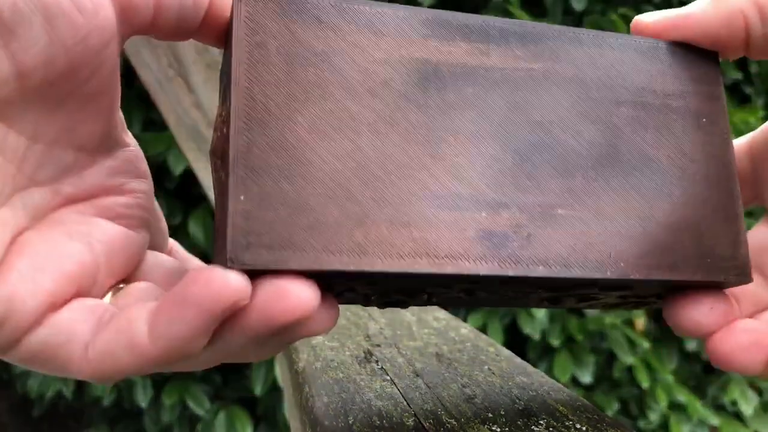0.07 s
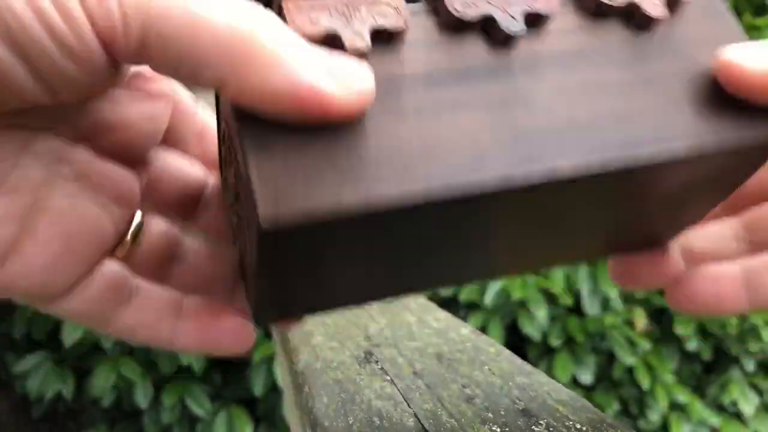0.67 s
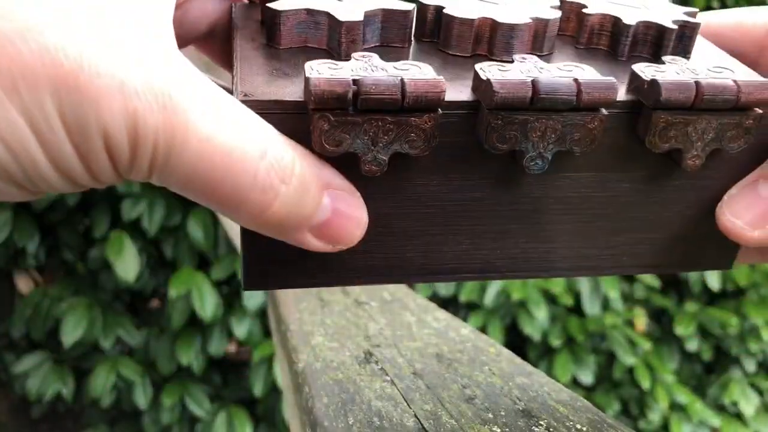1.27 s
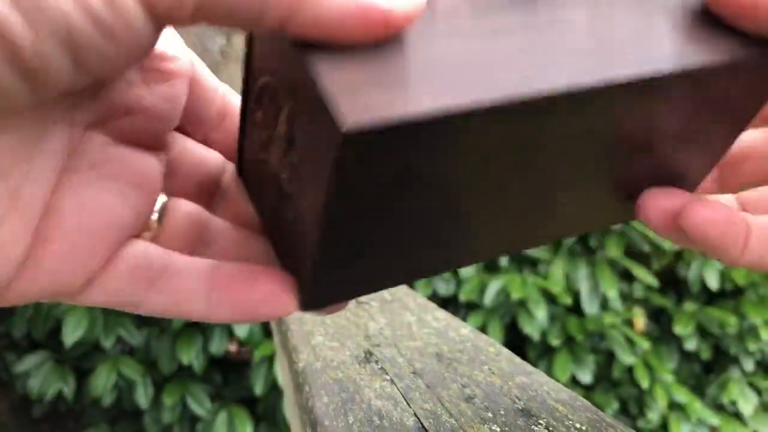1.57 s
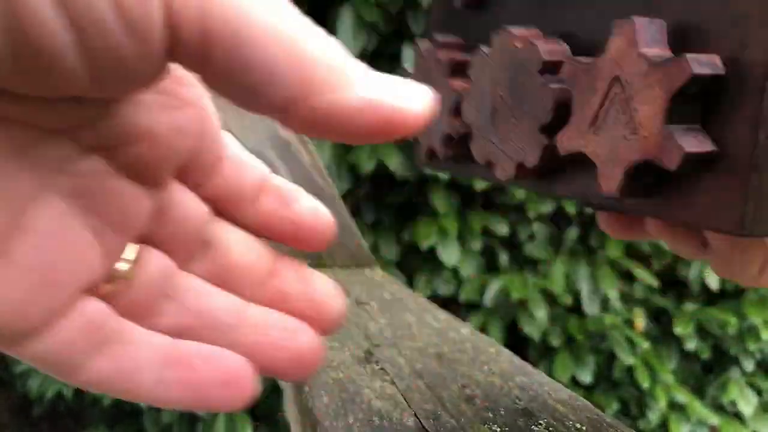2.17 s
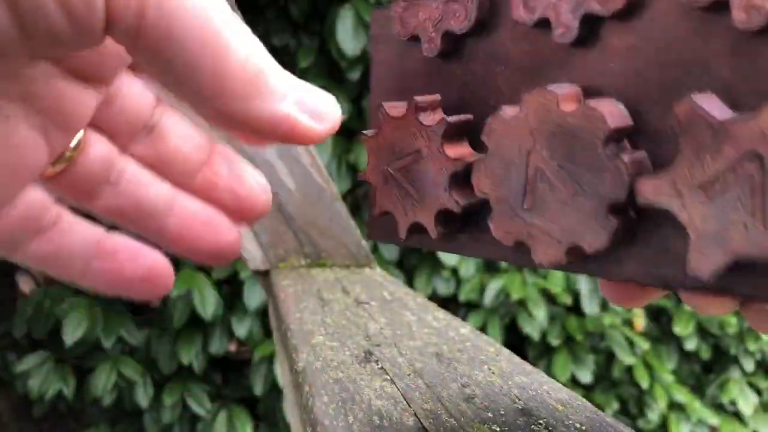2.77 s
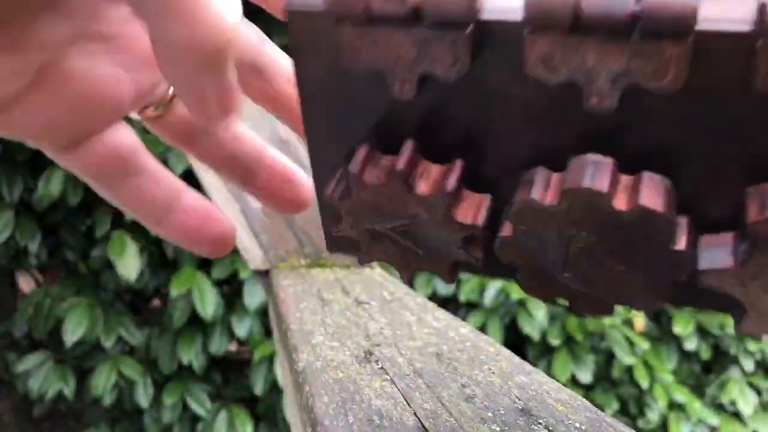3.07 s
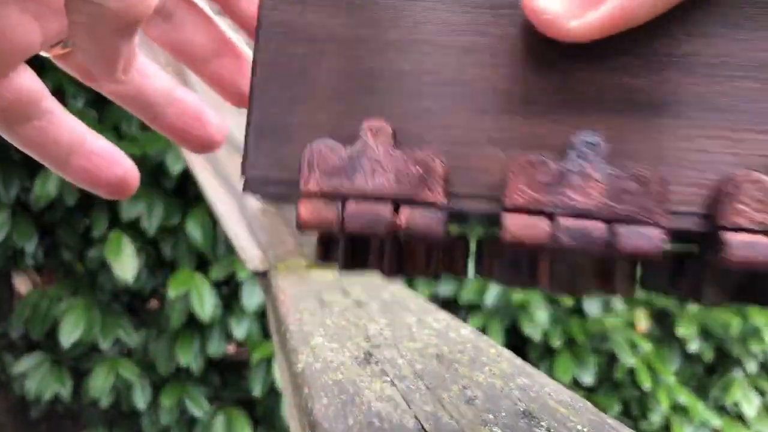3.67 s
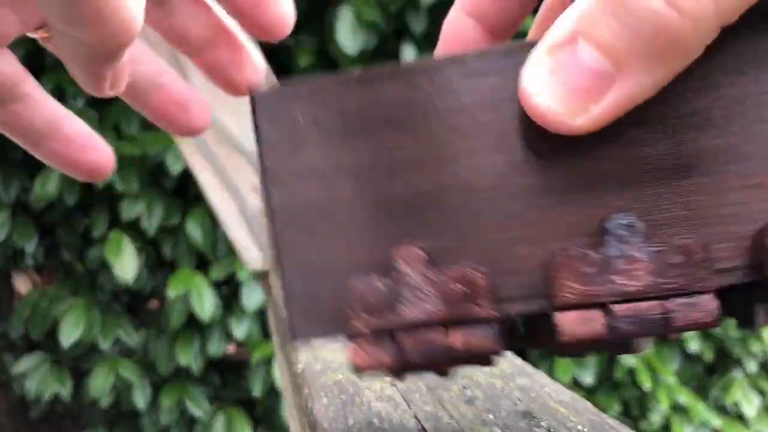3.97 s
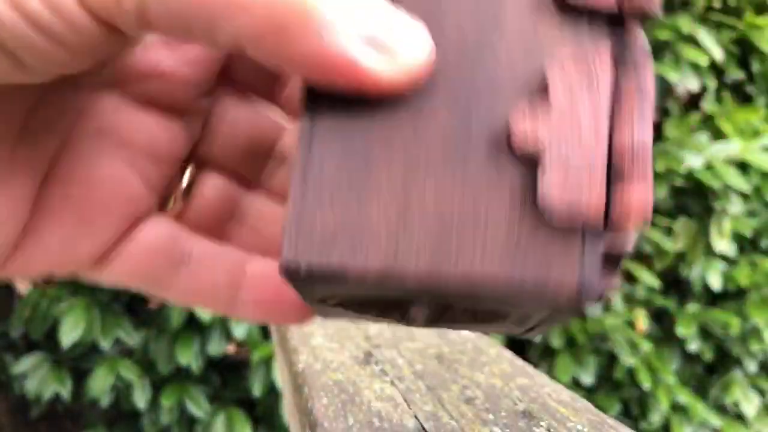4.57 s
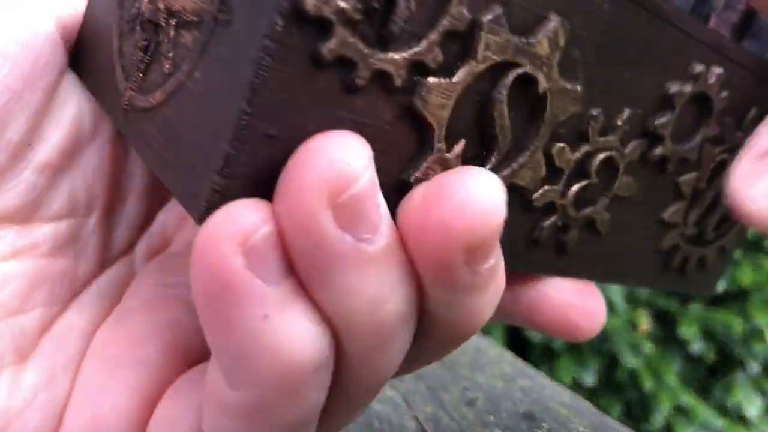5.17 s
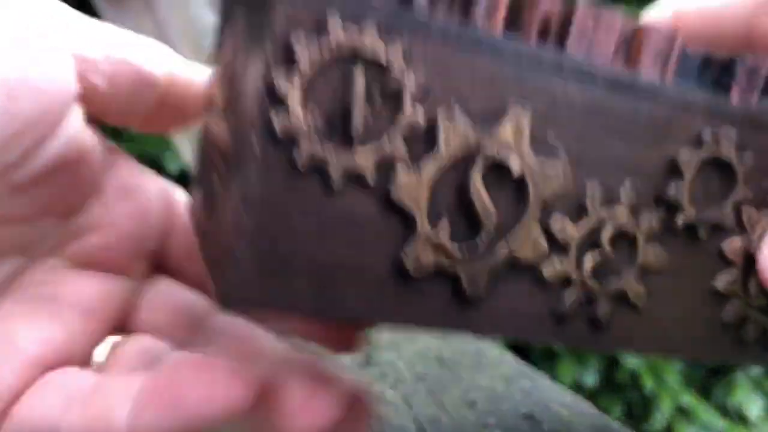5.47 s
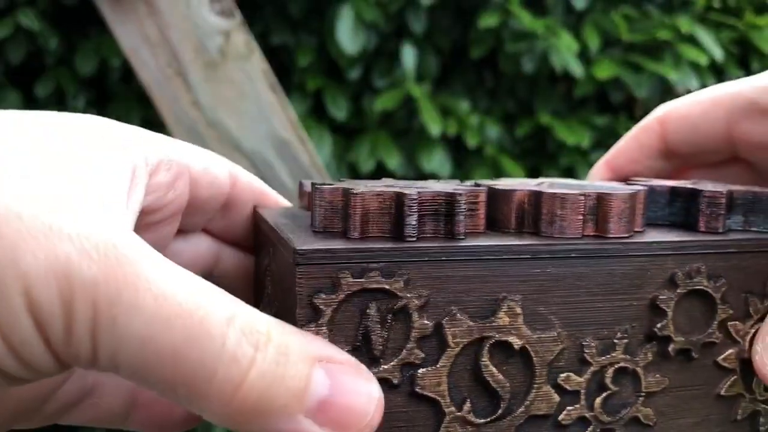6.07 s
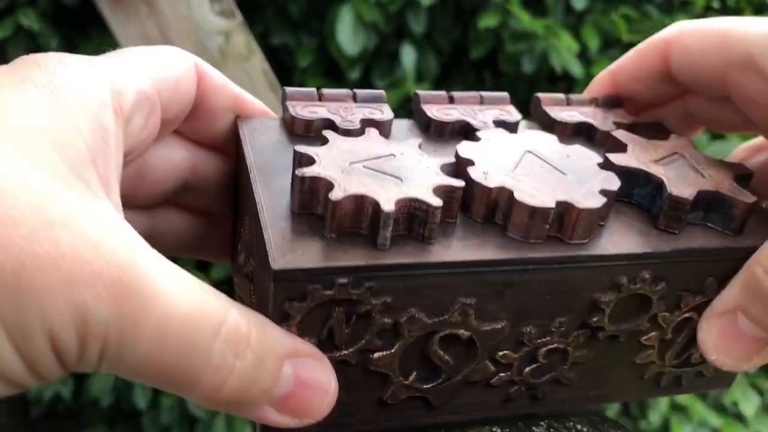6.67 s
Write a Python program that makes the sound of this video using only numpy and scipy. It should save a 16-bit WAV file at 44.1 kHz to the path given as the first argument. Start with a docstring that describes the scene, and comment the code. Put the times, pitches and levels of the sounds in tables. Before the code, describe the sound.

Close up, hands tilt a hard plastic box back and forth, setting off gritty scrapes, hollow knocks and small sharp clicks from its loose parts and latches. The clatter comes in uneven clusters with short lulls, and the sharpest knock falls about halfway through. Near the end the handling softens, a bird chips once very faintly, and a few light knocks follow. The garden around it is still, with only a distant rumble.

```python
"""Puzzle box in a garden

A hollow plastic puzzle box is turned over in the hands, close up, in a quiet garden. Loose parts
slide along its walls and knock against them, and gears and latches tick on the lid; all of them ring
the same modes of the case. Skin brushes it, a bird chips once, and a low rumble comes from far away."""
import sys
import numpy as np
from scipy import signal
from scipy.fft import rfft, irfft
from scipy.io import wavfile
from scipy.ndimage import uniform_filter1d, minimum_filter1d

SR = 44100
rng = np.random.default_rng(int(sys.argv[2]) if len(sys.argv) > 2 else 0)


def output_pcm(signal):
    """Save a mono or channel-first signal as 16-bit PCM at the path in sys.argv[1].

    Samples are clipped to [-1, 1] before scaling.
    """
    pcm = np.clip(np.atleast_2d(signal).T, -1, 1) * 32767
    wavfile.write(sys.argv[1], SR, np.round(pcm).astype(np.int16))


N = 304290
RING_TIME = np.arange(2600) / SR  # time axis of one ring of the box

# the box's registers (deep, hollow, wall, edge, fine), each with a crowd of weak modes:
# low f/Hz, high f/Hz, crowd decay/s, crowd level/dB
REGISTERS = [(246, 800, 0.0029, -3), (441.8, 1110, 0.0078, -9), (970, 2910, 0.0065, -7.5),
             (2800, 6700, 0.0022, -1.5), (7340, 12300, 0.0017, -1.5)]
# each tilt sets parts sliding; they gather speed, run and come to rest:
# t/s, rise/s, run/s, fade/s, level/dB, hollowness/dB, brightness/dB
SLIDES = [(0, 0.018, 0.072, 0.046, -37.5, -0.5, -15.5), (0.089, 0.018, 0.089, 0.083, -55.5, -4, -23),
          (0.279, 0.019, .12, 0.029, -58, 6, -29), (.62, 0.028, 0.11, .05, -60, 3, -28.5),
          (.7, 0.063, 0.11, 0.046, -45.5, 0.5, -25.5), (.88, 0.028, 0.25, 0.13, -44.5, 0.5, -25),
          (1.581, 0.088, 0.11, 0.38, -47.5, 3, -19), (2.179, 0.051, 0.37, 0.056, -40, -1.5, -16.5),
          (2.6, 0.035, .25, 0.051, -46, 2, -25.5), (2.899, 0.023, 0.16, 0.052, -46, 3, -16.5),
          (3.26, 0.098, .36, 0.057, -49.5, 7.5, -15), (3.69, 0.042, 0.15, .06, -43, 1.5, -16.5),
          (3.869, .03, .15, 0.042, -57, 7, -16.5), (4.021, 0.038, .2, .04, -48.5, 4.5, -27),
          (4.27, 0.061, .22, .06, -65, 9.5, -20), (4.66, .16, .045, 0.086, -37, 1.5, -21),
          (4.88, .025, .07, 0.076, -38, -1, -18), (5.84, 0.17, 0.012, 0.14, -46.5, -2, -38)]
# the deep ring against the hollow one, lower where the hands hold tightly: t/s, level/dB
DEPTH = [(0, -10.5), (.4, -5.5), (.8, -8), (1, -22), (1.8, -31), (2.05, -9), (3, -5.5), (3.6, -12.5),
         (4.2, -14.5), (4.45, -7), (4.85, -9.5), (6, -13)]


def amp(db):
    """Decibels to gain."""
    return 10 ** (np.asarray(db) / 20)


def unit_rms(x):
    """Scales to rms 1."""
    return x / np.sqrt(np.mean(x ** 2) + 1e-20)


def curve(points):
    """Joins (t/s, value) points into a value at every sample."""
    return np.interp(np.arange(N) / SR, *np.transpose(points))


def add(mix, start_s, sound):
    """Mixes a sound in at its start time."""
    part = mix[max(round(start_s * SR), 0):][:len(sound)]
    part += sound[:len(part)]


def band(x, low_hz, high_hz, order=2):
    """One band of a signal, at rms 1."""
    sos = signal.butter(order, [low_hz, high_hz], "band", fs=SR, output="sos")
    return unit_rms(signal.sosfilt(sos, x))


def noise(spectrum):
    """Noise of rms 1, coloured by (f/Hz, level/dB) points."""
    hz, db = np.transpose(spectrum)
    colour = amp(np.interp(np.log(np.fft.rfftfreq(N, 1 / SR) + 1), np.log(hz), db))
    return unit_rms(irfft(rfft(rng.standard_normal(N)) * colour, N))


def wander(rate_hz):
    """Smooth random drift of rms 1."""
    rolloff = np.exp(-(np.fft.rfftfreq(N, 1 / SR) / rate_hz) ** 2)
    return unit_rms(irfft(rfft(rng.standard_normal(N)) * rolloff, N))


def garden(drone_hz=72, width_hz=7):
    """A far-off wash of air, and a low rumble that swells around one narrow drone."""
    # colour of the air: f/Hz, level/dB
    air_spectrum = [(25, -30.5), (50, -12), (72, -2), (120, -4), (170, -12), (260, -9), (340, -9.5),
                    (450, -19.5), (560, -11), (660, -6), (800, -15.5), (980, -13.5), (1840, -29.5),
                    (4000, -39.5), (16000, -53.5)]
    # swell of the air: t/s, level/dB
    air_swell = [(0, -65), (1.45, -67), (3.2, -67), (4.62, -65.5), (5.2, -65.5), (5.7, -62), (6.3, -67),
                 (6.9, -67)]
    # swell of the distant rumble: t/s, level/dB
    rumble_swell = [(0, -68), (.6, -79.5), (1.5, -76.5), (2.2, -71), (3.5, -73), (5, -84), (5.8, -84.5),
                    (6.2, -69), (6.55, -72), (6.9, -72)]
    air = noise(air_spectrum) * amp(curve(air_swell) + .5 * wander(5))
    drone = band(rng.standard_normal(N), drone_hz - width_hz / 2, drone_hz + width_hz / 2)
    murk = band(rng.standard_normal(N), 80, 180, order=3)
    return air + (drone + amp(-4) * murk) * amp(curve(rumble_swell))


def box_ring(wall_hz, tick_hz, wall_db, tick_db, spread_db, damping):
    """The box's ring in five registers of energy 1; the place of the touch favours some modes."""
    # resonances of the box: f/Hz, width/Hz, level/dB
    box_modes = [(313.6, 83, -12.5), (439.1, 98, -4.5), (565, 48, -6), (662.3, 66, 9), (785, 130, -13),
                 (1064.6, 40, -8), (1193, 110, -8.5), (1328, 89, -4.5), (1440, 76, -4.5), (1580, 86, -5.5),
                 (1790, 92, -10.5), (2170, 110, -9), (2388, 140, -7), (2570, 69, -13), (3087, 400, -7),
                 (3640, 350, -6), (3920, 170, -8.5), (4270, 160, -15), (4650, 320, -17), (5600, 290, -8.5),
                 (5800, 260, -14.5), (6700, 380, -5.5), (7540, 340, -15), (8260, 1500, -8),
                 (9200, 430, -9.5), (9500, 420, -16.5), (11400, 540, -28), (12300, 550, -23.5),
                 (14330, 800, -8.5)]
    hz, width, db = np.transpose(box_modes)
    favour_db = wall_db * np.exp(-(np.log(hz / wall_hz) / .1) ** 2)
    favour_db += tick_db * np.exp(-(np.log(hz / tick_hz) / .068) ** 2)
    weight = amp(db + favour_db + spread_db * rng.standard_normal(len(hz)))
    weight *= rng.choice([-1, 1], len(hz))
    grip = 1 + .0083 * rng.standard_normal(len(hz))  # the fingers detune each mode a little
    decays = np.exp(-np.pi * damping * np.outer(width, RING_TIME))
    swings = decays * np.sin(2 * np.pi * np.outer(hz * grip, RING_TIME))
    modes = (weight * np.sqrt(width))[:, None] * swings
    register = np.searchsorted([row[0] for row in REGISTERS[1:]], hz)
    cavity_echo = .04 * np.exp(-RING_TIME / .012)
    rings = []
    for k, (low_hz, high_hz, decay_s, crowd_db) in enumerate(REGISTERS):
        crowd = rng.standard_normal(len(RING_TIME)) * (np.exp(-RING_TIME / decay_s) + cavity_echo)
        clear = band(modes[register == k].sum(0), low_hz, high_hz)
        rings.append(unit_rms(clear + amp(crowd_db) * band(crowd, low_hz, high_hz)))
    return np.array(rings) / np.sqrt(len(RING_TIME))


def rub_power(db, hollow_db, bright_db):
    """The power that one rub puts into each register."""
    return amp(db + np.array([hollow_db, hollow_db, 0, .68 * bright_db, bright_db]))[:, None] ** 2


def pressure(swell_db=34):
    """How hard sliding drives each register: long slides, plus scuffs that bite and ease off."""
    # a part binds and is shoved on: t/s, length/s, level/dB, hollowness/dB, brightness/dB
    scuffs = [(0.389, 0.029, -47.5, 2, -35), (0.797, 0.011, -38.5, -10, -14.5),
              (.895, 0.014, -42, 4.5, -17), (0.943, 0.017, -50, 11.5, -21), (1.079, 0.017, -42.5, 8, -20),
              (1.566, 0.032, -49.5, 6.5, -27), (1.694, 0.011, -35.5, -9, -0.5), (2.05, 0.03, -48, 3, -13),
              (2.124, 0.015, -66.5, 11, -12), (2.211, 0.03, -37, 3.5, -9),
              (2.369, 0.051, -34.5, 3.5, -15.5), (2.525, 0.052, -35, 1.5, -10),
              (2.623, 0.033, -33.5, -4, -9.5), (2.679, 0.05, -33, 0.5, -7.5), (2.77, 0.031, -36, 0.5, -16),
              (2.826, 0.046, -34.5, 1.5, -10.5), (3.015, 0.016, -42.5, 5.5, -4.5),
              (3.321, 0.014, -49, 10.5, -1), (3.365, 0.025, -38, 3, -5.5),
              (3.448, 0.017, -33.5, -3.5, -13.5), (3.48, 0.01, -41, 3.5, 0.5), (3.596, 0.021, -35, 7.5, -4),
              (3.747, 0.021, -33, 0, -2.5), (3.778, 0.018, -34, 3.5, -8), (3.83, 0.023, -40, 5.5, 1),
              (3.862, 0.019, -38.5, 0.5, -10), (3.92, 0.028, -41, 3.5, -9.5), (3.952, 0.013, -36, -1, -7.5),
              (4.168, .014, -34.5, -3.5, -21), (4.407, 0.016, -53, 6, -27), (4.488, 0.0063, -40, 8, -6),
              (4.509, 0.019, -50.5, 8, -20), (5.94, 0.01, -56, 0, -36), (6.357, 0.013, -60.5, 4.5, -26)]
    t = np.arange(N) / SR
    power = np.zeros((len(REGISTERS), N))
    for start, rise, run, fade, *colour in SLIDES:
        rising = (start + rise - t) / rise
        fading = (t - start - rise - run) / fade
        slide_db = np.clip(-swell_db * np.maximum(rising, fading), -100, 0)
        power += rub_power(*colour) * amp(slide_db) ** 2
    for start, length, *colour in scuffs:
        progress = np.arange(0, 2, 1 / (length * SR))  # in lengths of the scuff
        shove = np.interp(progress, [0, .12, .7, 1.15, 1.8], [.14, .95, .49, .0024, .0025])
        for register, push in zip(power, rub_power(*colour) * shove):
            add(register, start - .0015, push)
    power[0] *= amp(curve(DEPTH)) ** 2
    return np.sqrt(power)


def sliding(catches_per_s=4500, grain_db=5, judder_db=4, dwell_s=.006, spots=20):
    """A part catches on the grain of the plastic, spot after spot; each catch rings the box."""
    size_db = grain_db * np.minimum(rng.exponential(1, N), 3.3) + judder_db * wander(125)
    hits = rng.choice([-1, 1], N) * (rng.random(N) < catches_per_s / SR)
    # big catches are sharper: the treble is gritty while the low ring runs more evenly
    grit = np.array([unit_rms(hits * amp(contrast * size_db)) for contrast in (.044, .1, .3, .46, 1)])
    catches = pressure() * grit
    spot = rng.integers(0, spots, N)[np.cumsum(rng.random(N) < 1 / (dwell_s * SR))]
    out = np.zeros((len(REGISTERS), N))
    for k, tick_hz in enumerate(np.geomspace(3500, 12000, spots)):
        wall_hz = rng.uniform(1300, 1680)
        rings = box_ring(wall_hz, tick_hz, wall_db=6.5, tick_db=4, spread_db=2.5, damping=.93)
        out += signal.oaconvolve(catches * (spot == k), rings, axes=1)[:, :N]
    balance = amp([-.6, -.4, -.3, .1, .2])
    return (balance[:, None] * out).sum(0)


def blow(register_db, wall_hz, tick_hz, focus_db, rebound_db=-8):
    """Something strikes the case and rebounds at once."""
    rings = box_ring(wall_hz, tick_hz, wall_db=focus_db, tick_db=20.5, spread_db=4.5, damping=.89)
    rings *= np.sqrt(.008 * SR) * amp(register_db)[:, None]  # the energy of 8 ms at each level
    rebound_s = .003 * rng.uniform(.5, 1.5)
    # the tick comes first; the walls, then the air inside, take a moment to swing
    lags_s = .0005 * np.array([2, 1.98, .83, .067, 0])
    out = np.zeros(2 * len(RING_TIME))
    for ring, lag_s in zip(rings, lags_s):
        add(out, lag_s, ring)
        add(out, lag_s + rebound_s, amp(rebound_db) * ring)
    return out


def ticks(lid_hz=1950, fine_db_per_octave=19):
    """Light latches barely move the air inside; the higher they ring, the finer their tick."""
    # a latch or gear ticks on the lid: t/s, level/dB, f/Hz
    latch_ticks = [(.0085, -36, 5970), (0.913, -44.5, 4030), (.939, -44, 3990), (.9775, -37, 5600),
                   (1.009, -35, 5610), (1.123, -47.5, 3930), (1.1795, -47, 5610), (1.197, -42.5, 6740),
                   (1.2532, -37, 3870), (1.2858, -40, 6700), (1.304, -41.5, 3890), (1.368, -56.5, 3950),
                   (1.388, -64, 3650), (1.7737, -35.5, 7400), (2.4129, -31, 9540), (3.361, -34, 9230),
                   (3.7118, -32.5, 8750), (3.9959, -44.5, 6440), (4.7463, -40, 3920), (4.7781, -36.5, 6480),
                   (4.7862, -41, 7560), (4.793, -37, 9250)]
    out = np.zeros(N)
    for start, db, hz in latch_ticks:
        fine_db = -7 + fine_db_per_octave * np.log2(hz / 6000)
        register_db = db + np.array([-36, -20, -4, 0, fine_db])
        add(out, start, blow(register_db, lid_hz, hz, focus_db=15))
    return out


def knock(start, db, hard_db, wall_hz, part_hz, middle_hz=1380, muffle_share=.8):
    """A part hits a wall: harder blows reach higher, softer ones ring purer."""
    depth_db = np.interp(start, *np.transpose(DEPTH))
    # blows near the middle of the broad wall pump the air inside the most; a tight hold muffles it
    pump_db = 4 - 11 * abs(np.log2(wall_hz / middle_hz))
    hollow_db = pump_db + muffle_share * depth_db
    register_db = db + np.array([hollow_db + depth_db - 3, hollow_db, 0, hard_db, 1.8 * hard_db - 8])
    return blow(register_db, wall_hz, part_hz, focus_db=17 - .4 * hard_db)


def knocks():
    """The clear knocks of loose parts against the walls."""
    # a part strikes a wall: t/s, level/dB, hardness/dB, wall f/Hz, part f/Hz
    strikes = [(0.0163, -33.5, -8, 1420, 4760), (0.0245, -31.5, -2.5, 1980, 5700),
               (0.0758, -37, 1.5, 1280, 5500), (.292, -45, -12, 1400, 3900), (.3087, -36.5, -8, 1720, 4650),
               (.349, -48.5, -7, 1290, 3100), (0.519, -65.5, -25, 1440, 3530),
               (.836, -31.5, -1.5, 1015, 3480), (.8491, -33, -4, 1032, 3465), (.8621, -39, 1.5, 1030, 3520),
               (0.8939, -30.5, -9.5, 1423, 3720), (.9575, -43.5, -2, 1290, 6200),
               (1.0005, -29.5, -10, 1260, 5510), (1.029, -36.5, -5, 1266, 3400),
               (1.038, -36.5, -3.5, 1380, 3590), (1.0617, -40, 2.5, 1180, 5220),
               (1.0827, -41, -1.5, 1290, 3690), (1.0902, -39, 0.5, 1460, 5700),
               (1.0969, -38.5, -4, 1800, 5680), (1.159, -42.5, -4.5, 1353, 3640),
               (1.3364, -42, -2.5, 1246, 3880), (1.652, -41.5, -20, 1010, 3310),
               (1.712, -30.5, -18, 1420, 4670), (1.7368, -35.5, -11, 1480, 3370),
               (1.7554, -32, -1.5, 1440, 6600), (1.7839, -35, -2.5, 1580, 6700),
               (1.8476, -27.5, -11.5, 1480, 5300), (1.8702, -41, -10, 1390, 3780),
               (1.881, -39, -10.5, 1490, 3700), (2.188, -49.5, -27, 1420, 3680),
               (2.2749, -31.5, -2, 1534, 3920), (2.2879, -31, -7.5, 1545, 3640),
               (2.3126, -34, -4, 1580, 3750), (2.511, -34, -14, 2170, 5270),
               (3.0439, -44.5, 5.5, 1393, 5640), (3.12, -55, -6.5, 1482, 5600),
               (3.2681, -58.5, -11.5, 1050, 3860), (3.5402, -40.5, 6.5, 1490, 5570),
               (3.5464, -25.5, -6, 1500, 4140), (3.5973, -29, -17, 1580, 5600),
               (3.6738, -19.5, 2, 1380, 3960), (3.679, -35, -14, 1170, 3800), (3.694, -33, -8, 1130, 4000),
               (3.8584, -27, 2, 1380, 4100), (4.0495, -43, -7, 1270, 3590),
               (4.1052, -39.5, -17, 1350, 3850), (4.1414, -30, -32, 1140, 3530),
               (4.1577, -31.5, -15, 1120, 3640), (4.173, -35, -9.5, 1192, 3600),
               (4.224, -34, -36, 1142, 3400), (4.241, -32.5, -39, 1175, 3610),
               (4.252, -33.5, -24, 1150, 3590), (4.3544, -45, -4, 1494, 3600),
               (4.3673, -45.5, -3.5, 1012, 3760), (4.7635, -40, -5.5, 1080, 4380),
               (4.8045, -29.5, 1.5, 1547, 9400), (4.8282, -33, 0.5, 1570, 3730),
               (4.8576, -32.5, -5, 1538, 5290), (4.8853, -36.5, 2.5, 1590, 4650),
               (4.893, -29, -8, 1435, 3640), (4.975, -42, -2, 1166, 3860), (5.018, -46.5, -5, 1280, 3870),
               (5.6175, -60, -27, 1150, 3380), (5.64, -50, -33, 1270, 3520),
               (5.814, -59.5, -35, 1260, 3680), (5.8878, -49.5, -15, 1165, 4270),
               (5.9759, -41, -7, 1780, 3850), (5.996, -39, -7, 1268, 3520),
               (6.0445, -44.5, -13, 1746, 3500), (6.0822, -46, -10, 1267, 3490)]
    out = np.zeros(N)
    for start, *strike in strikes:
        add(out, start, knock(start, *strike))
    return out


def rattle(knocks_per_s=45):
    """Running parts jostle: small chance knocks that follow the level and brightness of their slide."""
    out = np.zeros(N)
    for start, rise, run, _, db, _, bright_db in SLIDES:
        for place, wall, part, size, hard in rng.uniform(-1, 1, (round(knocks_per_s * run), 5)):
            onset = start + rise + run * (place + 1) / 2
            hard_db = 7 + .7 * bright_db + 4 * hard
            wall_hz, part_hz = 1480 * np.exp(.21 * wall), 5200 * np.exp(.72 * part)
            add(out, onset, knock(onset, db - 2 + 3 * size, hard_db, wall_hz, part_hz))
    return out


def palms():
    """Dry skin hisses softly across the case."""
    # swell of the brushing, one list a stroke: t/s, level/dB
    strokes = [
        [(1.42, -106), (1.478, -77), (1.526, -76), (1.56, -73)],
        [(1.92, -82), (1.938, -96), (1.98, -81.5), (2.04, -100)],
        [(5.08, -81), (5.2, -99.5), (5.214, -101), (5.292, -75), (5.312, -85), (5.356, -70.5), (5.432, -71),
         (5.6, -102)],
    ]
    # colour of skin on plastic: f/Hz, level/dB
    skin_spectrum = [(1500, 3), (3500, -5.5), (5500, -4), (9000, -8), (14000, -8), (16000, -16)]
    level = np.zeros(N)
    for stroke in strokes:
        times, db = np.transpose(stroke)
        t = np.arange(times[0], times[-1], 1 / SR)
        add(level, times[0], amp(np.interp(t, times, db)) * signal.windows.tukey(len(t), .15))
    return level * noise(skin_spectrum) * amp(-.5 + 1.2 * wander(60))


def bird(echo_delay_s=.0082, echo_decay_s=.026, echo_db=-13.5):
    """A thin rising chip, all upper harmonics, with a short echo from the hedge."""
    # contour of the chip: t/s, fundamental f/Hz, level/dB
    contour = [(5.655, 890, -93), (5.662, 1130, -64.5), (5.672, 1290, -62), (5.684, 1304, -63),
               (5.697, 1260, -74), (5.703, 1210, -87)]
    # the bird's timbre: harmonic number, level/dB
    harmonics = [(3, -6), (4, 0), (5, -7), (6, -6), (7, -11), (9, -19)]
    times, hz, db = np.transpose(contour)
    t = np.arange(times[0], times[-1], 1 / SR)
    phase = 2 * np.pi * np.cumsum(np.interp(t, times, hz)) / SR
    tone = unit_rms(sum(amp(level) * np.sin(k * phase) for k, level in harmonics))
    call = amp(np.interp(t, times, db)) * tone
    lag = np.arange(SR // 4) / SR
    hedge = rng.standard_normal(len(lag)) * np.exp(-lag / echo_decay_s)
    echo = signal.fftconvolve(call, hedge / np.linalg.norm(hedge))
    out = np.zeros(N)
    add(out, times[0], call)
    add(out, times[0] + echo_delay_s, amp(echo_db) * echo)
    return out


def scene(low_cut_hz=195):
    """The box in the hands, its sound cut off steeply below about 200 Hz, with the garden behind it."""
    backdrop = palms() + bird() + garden()
    box = sliding() + knocks() + ticks() + rattle()
    low_cut = signal.butter(3, low_cut_hz, "high", fs=SR, output="sos")
    return (signal.sosfilt(low_cut, box) + backdrop)[None]


def record(dry, ceiling_db=-17, top_hz=16600):
    """A fast limiter holds down the sharpest knocks; a steep low-pass trims the very top."""
    allowed = np.minimum(1, amp(ceiling_db) / (abs(dry) + 1e-9))
    gain = uniform_filter1d(minimum_filter1d(allowed, size=90), size=70)
    low_pass = signal.firwin(301, top_hz, window=("kaiser", 8), fs=SR)
    return signal.oaconvolve(dry * gain, low_pass[None], "same")


dry = scene()
out = record(dry)
output_pcm(out)
```